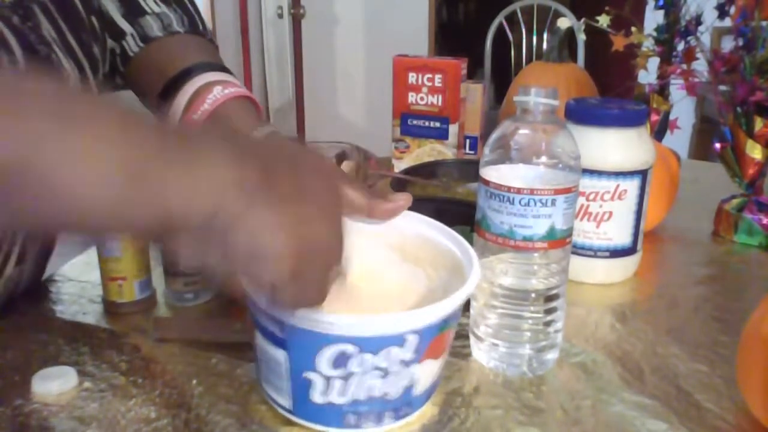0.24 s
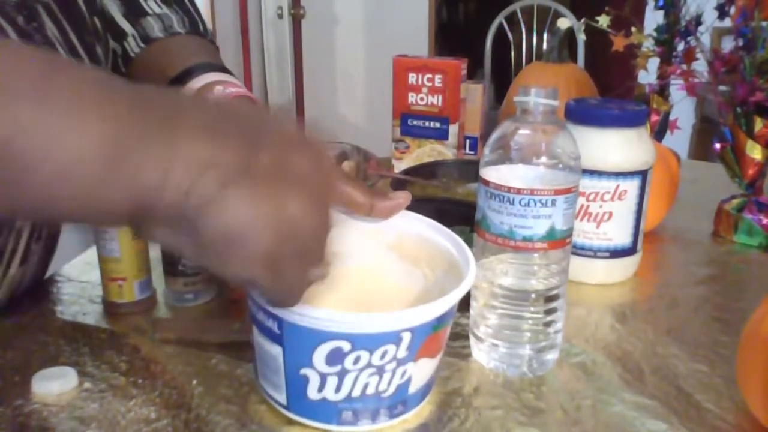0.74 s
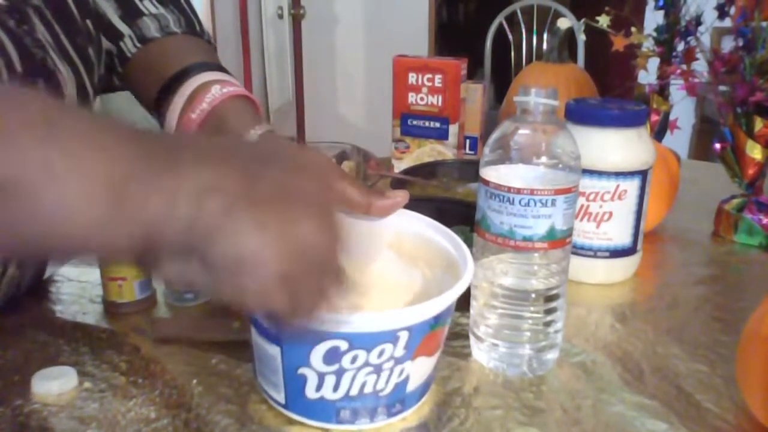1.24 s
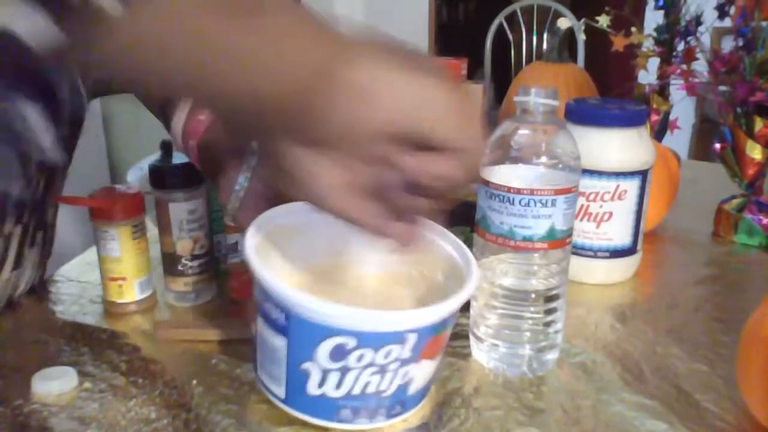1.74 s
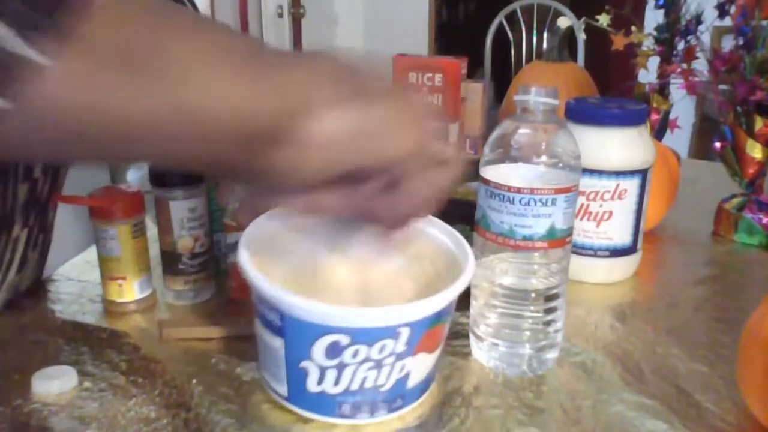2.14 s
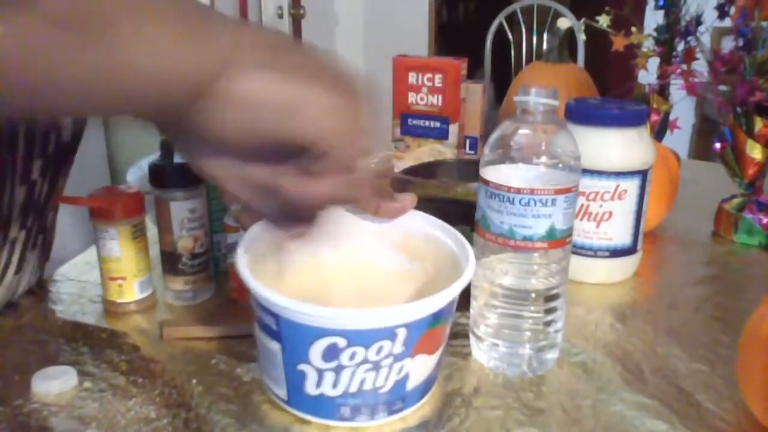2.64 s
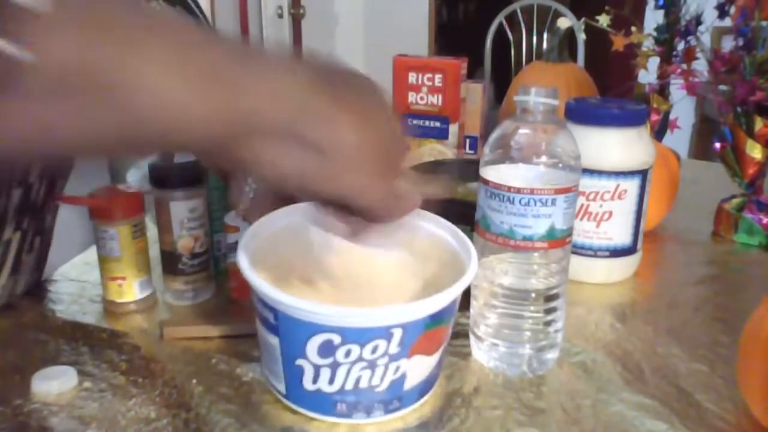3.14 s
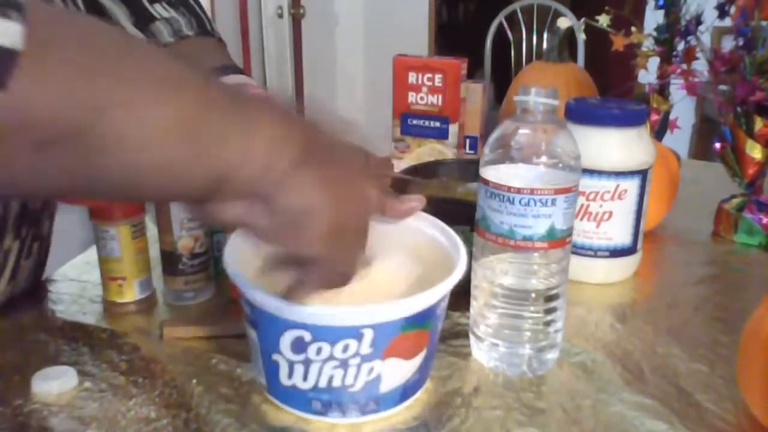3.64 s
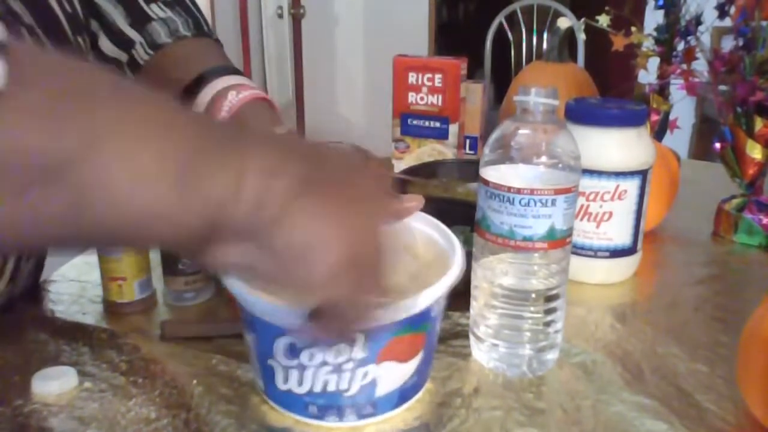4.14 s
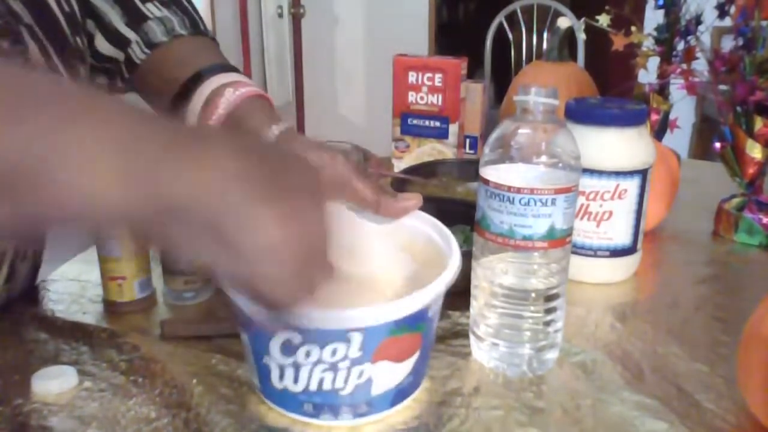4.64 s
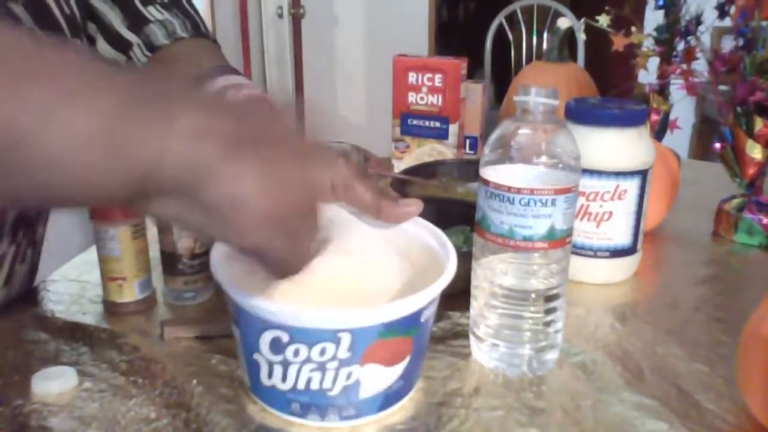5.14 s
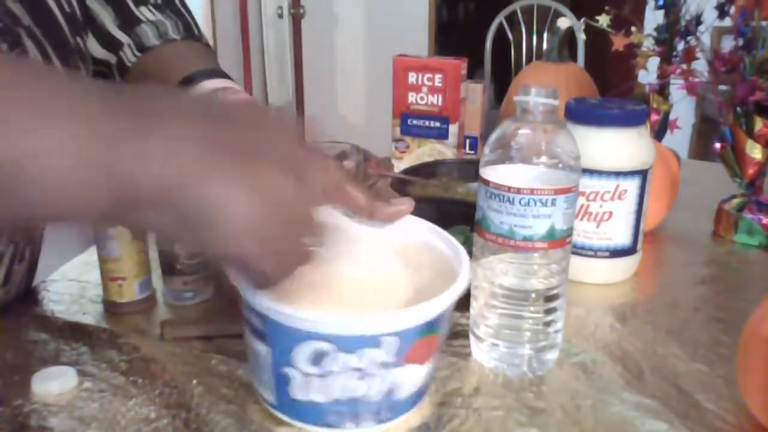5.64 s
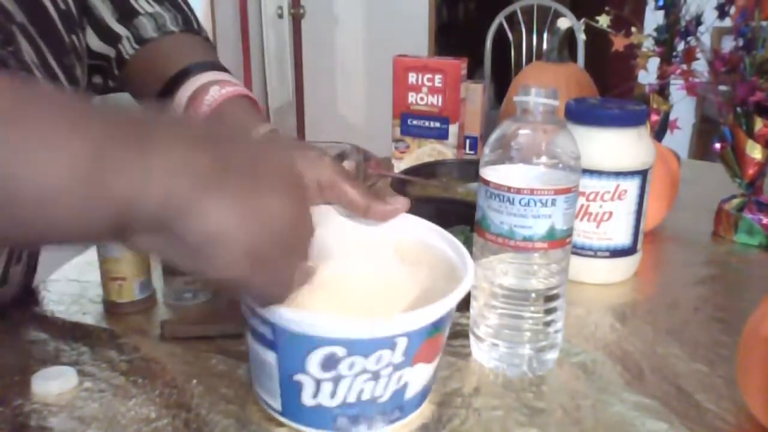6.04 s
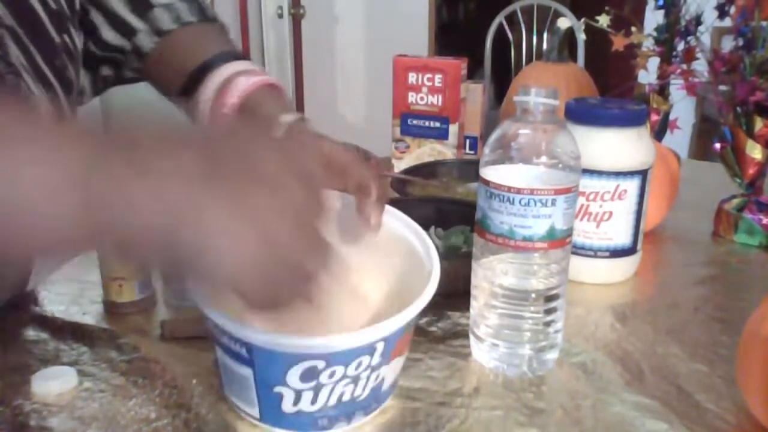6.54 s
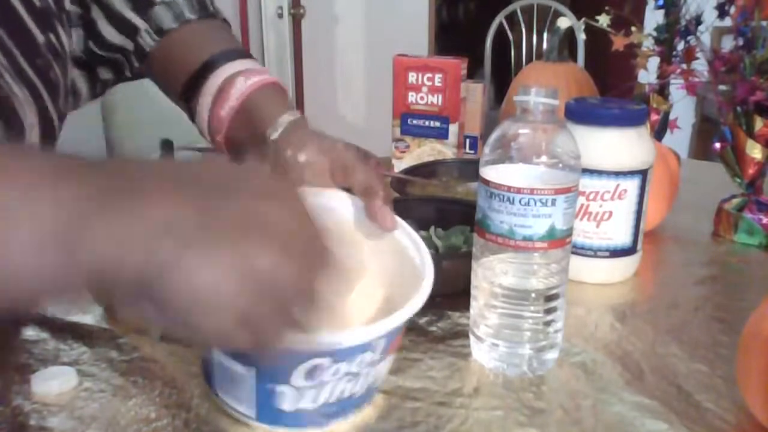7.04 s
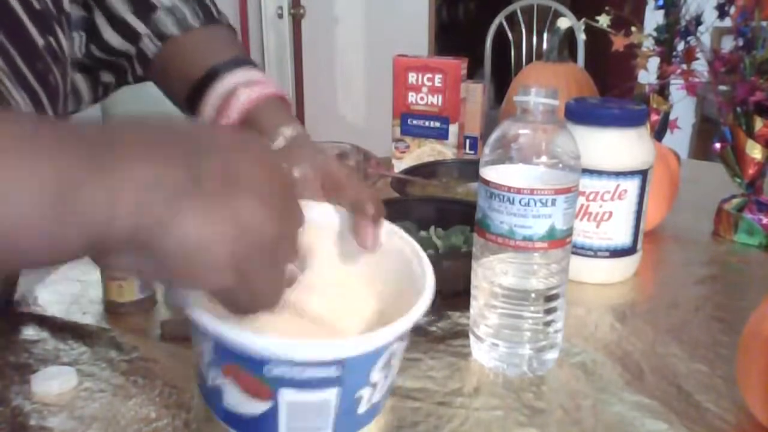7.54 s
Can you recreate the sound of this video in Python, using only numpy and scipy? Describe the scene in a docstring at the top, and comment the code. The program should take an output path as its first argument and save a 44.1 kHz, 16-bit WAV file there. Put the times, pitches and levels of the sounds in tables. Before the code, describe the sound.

Close in a small kitchen, a spoon beats thick batter in a thin plastic tub at four or five strokes a second. Each stroke gives a sticky squelch, a wet slap and a dull low thud. After a second or so the beating breaks off for soft scrapes and isolated pops, then resumes in a long even run. The sound is dull on top, with short gated tails.

```python
"""On a kitchen table a spoon beats thick batter in a thin plastic tub, four or five strokes a second,
with a pause to scrape down the side. Random bubble bursts, tuned by resonators, make each stroke's sticky drag;
torn films and ringing pockets make the slaps and pops; low modes of tub and table make the thuds.
A small room answers with dense reflections, and the recorder's noise gate shortens the tails."""
import sys
import numpy as np
from scipy import signal
from scipy.io import wavfile
from scipy.ndimage import uniform_filter1d

SR = 44100
rng = np.random.default_rng(int(sys.argv[2]) if len(sys.argv) > 2 else 0)


def output_pcm(signal):
    """Save a mono or channel-first signal as 16-bit PCM at the path in sys.argv[1].

    Samples are clipped to [-1, 1] before scaling.
    """
    pcm = np.clip(np.atleast_2d(signal).T, -1, 1) * 32767
    wavfile.write(sys.argv[1], SR, np.round(pcm).astype(np.int16))


N = 343980
TIME = np.arange(N) / SR

# beating strokes, from the spoon's entry to its arrival at the wall:
# start t/s, length t/s, effort level/dB, thud at the wall level/dB
STROKES = [(-.07, 0.057, -44.5, -36.5), (0.141, 0.047, -38.5, -30.5), (0.358, 0.059, -48, -41),
           (0.574, 0.033, -57.5, -35.5), (0.761, 0.056, -41.5, -39.5), (0.986, 0.062, -43, -53),
           (1.2, 0.041, -37.5, -39), (2.128, 0.022, -47.5, -47), (2.924, 0.032, -45, -40),
           (3.047, 0.031, -51, -70), (3.489, 0.057, -42.5, -31), (3.695, 0.07, -42, -38),
           (3.903, 0.045, -36.5, -39), (4.101, 0.084, -39.5, -37), (4.34, 0.045, -32, -32.5),
           (4.552, 0.051, -35.5, -41.5), (4.76, 0.069, -42.5, -34.5), (5.012, 0.047, -31, -32),
           (5.21, 0.062, -40.5, -40.5), (5.443, 0.073, -40, -40.5), (5.669, 0.063, -41, -33),
           (5.87, 0.088, -37.5, -33.5), (6.085, 0.095, -45, -39.5), (6.325, 0.07, -48, -33),
           (6.548, 0.062, -56.5, -35), (6.774, 0.091, -42, -38), (6.991, 0.073, -43.5, -50.5),
           (7.205, 0.078, -45, -42.5), (7.432, 0.058, -52, -60), (7.61, 0.051, -53, -65),
           (7.681, 0.058, -62.5, -67)]


def from_db(db):
    """The decibel is logarithmic: 20 dB is a factor of ten in amplitude."""
    return 10 ** (np.asarray(db) / 20)


def rms(x):
    """Effective amplitude is the root of the mean power."""
    return np.sqrt(np.mean(x ** 2) + 1e-20)


def band(x, edges_hz, order=2):
    """A causal band-pass keeps the energy between two frequencies."""
    return signal.sosfilt(signal.butter(order, edges_hz, "band", fs=SR, output="sos"), x + 1e-18)


def boost(x, hz, width_hz, db):
    """Resonance: a mode added to the direct sound lifts its own neighbourhood."""
    b, a = signal.iirpeak(hz, hz / width_hz, fs=SR)
    return x + (from_db(db) - 1) * signal.lfilter(b, a, x + 1e-18)


def add(out, s, sound):
    """Superposition: a sound adds linearly to the mix from time s."""
    start = int(s * SR)
    part = sound[max(-start, 0):max(N - start, 0)]
    out[max(start, 0):max(start, 0) + len(part)] += part


def in_tub(x):
    """Damped resonance: the tub colours every sound in the batter, which broadens the narrow modes."""
    # wall and hollow of the tub: f/Hz, undamped width f/Hz, boost level/dB
    tub_modes = [(462.3, 54, 8), (672.5, 39, 7.5), (961, 45, 7), (1100, 390, 6), (1590, 570, 7),
                 (1811, 45, 7.5), (2030, 50, 1.5), (2436, 450, 7.5), (3124, 45, 4), (3680, 860, 6),
                 (4850, 69, 0.5), (6240, 790, 2)]
    for hz, width_hz, db in tub_modes:
        damped_hz = max(width_hz, hz / 30)
        x = boost(x, hz, damped_hz, db)
    return x


def drag(length_s, attack_s, edges_hz, bursts_per_s, spread_db, hiss, release_s,
         bubble_q=30.0, bubble_db=20.0, grip_db=8.5, grip_s=.012):
    """Stick-slip and random bursting: bubbles of five sizes, each at bursts_per_s, excite damped resonances."""
    t = TIME[:int((max(length_s, .01) + .09) * SR)]
    release = np.exp(-np.maximum(t - length_s, 0) / release_s)
    push = (1 - np.exp(-t / attack_s)) * release
    # the spoon's hold on the batter wanders at random every grip_s
    grip = from_db(grip_db * np.interp(t / grip_s, np.arange(64), rng.standard_normal(size=64)))
    steps = np.geomspace(*edges_hz, num=6)
    bubbles = 0
    for hz in rng.uniform(steps[:-1], steps[1:]):
        born = rng.random(len(t)) < bursts_per_s / SR
        sizes = from_db(spread_db * np.minimum(rng.exponential(1, len(t)), 3))
        bubbles = bubbles + boost(sizes * born, hz, hz / bubble_q, bubble_db)
    source = bubbles / rms(bubbles) + hiss * rng.standard_normal(len(t))
    sound = band(in_tub(push * grip * source), edges_hz, order=3)
    return sound / rms(sound) * rms(push)


def drags():
    """Bubble size sets pitch: large ones squelch, small ones crackle, and a soft hiss marks the spoon's entry."""
    # light scrapes along the side, the longest in the pause: start t/s, length t/s, rasp level/dB
    scrape_table = [(0.941, .03, -61), (1.576, 0.18, -45.5), (1.99, 0.06, -63), (2.516, 0.2, -53.5),
                    (6.269, 0.018, -52.5), (6.455, 0.036, -55.5), (7.154, 0.1, -52)]
    squelch_hz, crackle_hz, rasp_hz = (360, 1400), (1500, 4640), (1800, 6600)
    usual_effort_db, crackle_db, crackle_growth = -45, -6, 1.36  # growth: crackle dB per dB of effort
    scrape_squelch_db = -5.5  # against the rasp: a scrape moves little batter
    stroke_attack_s, scrape_attack_s = .0005, .016  # a stroke bites at once, a scrape eases in
    entry_lead_s, entry_db, spray_s = 0.012, -11.0, 0.023  # the hiss peaks spray_s after its onset
    smooth_share = .3  # steady hiss against the crackle or rasp bubbles
    moves = []
    for start, length, db, _ in STROKES:
        high_db = usual_effort_db + crackle_db + crackle_growth * (db - usual_effort_db)
        moves.append((start, length, db, high_db, stroke_attack_s, crackle_hz))
    for start, length, db in scrape_table:
        moves.append((start, length, db + scrape_squelch_db, db, scrape_attack_s, rasp_hz))
    out, wetness = np.zeros(N), np.zeros(N)
    t = TIME[:SR // 5]
    spray = t / spray_s * np.exp(1 - t / spray_s)
    for start, length, low_db, high_db, attack_s, treble_hz in moves:
        add(wetness, start - entry_lead_s, from_db(high_db + entry_db) * spray)
        squelch = drag(length, attack_s, squelch_hz, bursts_per_s=710 / 6, spread_db=8.0,
                       hiss=smooth_share / 2, release_s=0.033)
        add(out, start, from_db(low_db) * squelch)
        crackle = drag(length, attack_s, treble_hz, bursts_per_s=200, spread_db=-2.0,
                       hiss=smooth_share, release_s=0.026)
        add(out, start, from_db(high_db) * crackle)
    hiss = band(in_tub(rng.standard_normal(N)), (1200, 6200))
    return out + wetness * hiss / rms(hiss)


def pushes():
    """Impulsive loading: a stroke loads the tub on entry and at the wall; rows of (s, swell s, dB)."""
    # push as the spoon enters, interpolated between rows, most in the middle run: t/s, level/dB
    entry_push = [(.1, -48.5), (.36, -40.5), (.7, -69), (1.3, -66), (2.9, -48.5), (3.7, -58), (4.1, -40.5),
                  (4.5, -37.5), (5.0, -34.5), (5.87, -35.5), (6.8, -65.5), (7.6, -75)]
    # the tub shifts on the table between strokes: t/s, level/dB
    nudge_table = [(0.069, -48), (.3, -43.5), (0.448, -51), (1.602, -37.5), (2.612, -51), (3.32, -43),
                   (4.468, -42.5), (4.638, -48), (6.512, -49)]
    entry_swell_s, wall_swell_s, nudge_swell_s = 0.028, 0.022, 0.026
    push_s, push_db = np.transpose(entry_push)
    entries = [(start, entry_swell_s, np.interp(start, push_s, push_db)) for start, *_ in STROKES]
    walls = [(start + length, wall_swell_s, db) for start, length, _, db in STROKES]
    return entries + walls + [(s, nudge_swell_s, db) for s, db in nudge_table]


def thuds():
    """Modal excitation: a soft load swells in the low modes, a little detuned by the hand, and the table hums on."""
    # tub and table together, before each thud's own variation: f/Hz, level/dB
    thud_modes = [(98, -14.5), (130, 1), (142, -1.5), (158, -18.5), (176, -5.5), (203, -8), (240, -12.5)]
    rumble_db = -15.5  # against the modes
    ring_hz, ring_t60_s, ring_db = 130.36, .45, -6.48
    out, t = np.zeros(N), TIME[:SR // 3]
    for s, swell_s, db in pushes():
        hum = 0
        for hz, mode_db in thud_modes:
            size, detune, phase = rng.standard_normal(3)
            mode = np.sin(2 * np.pi * (hz * (1 + .025 * detune) * t + phase))
            hum = hum + from_db(mode_db + 1.2 * size) * mode
        rumble = band(rng.standard_normal(len(t)), (65, 260))
        swell = (t / swell_s * np.exp(1 - t / swell_s)) ** 2
        ring_level = from_db(ring_db - 60 * t / ring_t60_s) * np.tanh(t / swell_s)
        ring = ring_level * np.sin(2 * np.pi * ring_hz * t)
        thud = swell * (hum / rms(hum) + from_db(rumble_db) * rumble / rms(rumble)) + ring
        add(out, s, from_db(db) * thud / rms(thud) * rms(swell))
    return out


def pocket_ring(hz, swell_cycles=1.26, glide=0.084, settle_cycles=2.0, linger_db=-21.0, linger_cycles=14.0):
    """Cavity resonance: an opening pocket rings a few cycles, its pitch sliding as the batter gives way."""
    cycles = hz * TIME[:SR // 20]
    size, slide, hold = rng.uniform(-1, 1, size=3)
    age = cycles / (swell_cycles * np.exp(.3 * size))
    # a soft tone lingers
    linger = from_db(linger_db + 4.5 * hold) * (1 - np.exp(-age)) * np.exp(-cycles / linger_cycles)
    linger = linger * np.linspace(1, 0, len(age))
    pitch = hz * (1 + glide * slide * (np.tanh(cycles / settle_cycles) - 1))
    return (age * np.exp(-age) + linger) * np.sin(2 * np.pi * np.cumsum(pitch) / SR)


def slap(hz, body_db, snap_db, tear_s=0.0038, tear=0.14, pocket_q=1.2, pocket_db=8.5, ring_db=5.0):
    """Impulse response: a film of batter bursts with a short tear, and the pocket behind it rings."""
    body_hz, smack_hz, snap_hz = (334, 811), (800, 2280), (2460, 5600)
    # the smack is strongest from middling pockets and falls with the square of the octaves away
    smack_peak_db, smack_best_hz, smack_fall_db = -10.5, 1170, 7
    t = TIME[:SR // 20]
    burst = (t == 0) + tear * np.exp(-t / tear_s) * rng.standard_normal(len(t))
    # a smaller fold beside the pocket rings briefly too
    fold_hz = rng.uniform(1500, 4200)
    burst = boost(burst, fold_hz, fold_hz / 9, 7)
    pop = in_tub(boost(burst, hz, hz / pocket_q, pocket_db))
    smack_db = smack_peak_db - smack_fall_db * np.log2(hz / smack_best_hz) ** 2
    parts = [band(pop, body_hz), band(pop, smack_hz, order=3), band(pop, snap_hz, order=3)]
    # the ring dominates the range in which it lies
    home = np.searchsorted([body_hz[1], snap_hz[0]], hz)
    ring = pocket_ring(hz)
    parts[home] = parts[home] / rms(parts[home]) + from_db(ring_db) * ring / rms(ring)
    # levels refer to the first 10 ms
    levels = (body_db, smack_db, snap_db)
    return sum(from_db(db) * part / rms(part[:SR // 100]) for db, part in zip(levels, parts))


def slaps(body_db=-4.5, snap_db=-5.5, stretch_s=.0012):
    """Film rupture: large pockets burst after a moment's stretch; small pops scatter along each stroke."""
    # larger air pockets as their films begin to stretch: t/s, strength level/dB, pocket pitch f/Hz,
    # body relative to body_db level/dB, snap relative to snap_db level/dB
    burst_table = [(0.143, -19, 1100, -15, -31.5), (0.148, -18, 1860, -10, -33.5),
                   (0.165, -21, 2780, -28, -6), (0.193, -17, 905, -10.5, -14), (0.24, -38, 1030, -5, -23.5),
                   (0.36, -24, 1144, -20.5, -31.5), (0.409, -9.5, 680, -8, -21), (0.573, -38, 910, -9, -43),
                   (0.611, -19.5, 1108, -11, -18), (0.65, -29, 1740, -31.5, -20.5),
                   (0.759, -14, 1850, -41.5, -7.5), (0.791, -22, 712, -8.5, -16),
                   (0.823, -16, 951, -20.5, -16), (0.864, -39, 1020, -22, -10.5),
                   (0.992, -16.5, 670, -16.5, -34), (1.008, -28, 1110, -38, -8.5),
                   (1.045, -21, 972, -23.5, -15.5), (1.17, -33.5, 2860, -20.5, -6),
                   (1.21, -28, 733, -5.5, -16.5), (1.245, -12.5, 1880, -10, -18),
                   (1.603, -21, 435, -11.5, -17.5), (1.709, -27.5, 2990, -44, 0.5),
                   (1.76, -18, 2496, -34, -1.5), (1.941, -30, 358, -3, -26.5), (1.975, -34, 448, -3, -25),
                   (2.002, -45, 2520, -20.5, -1.5), (2.143, -23.5, 1170, 2, -13),
                   (2.39, -46.5, 2270, -25.5, -37.5), (2.485, -41, 1930, -16.5, -35),
                   (2.725, -40.5, 910, -29.5, -17), (2.938, -19, 1040, -3.5, -14),
                   (2.992, -43.5, 613, 5.5, -9), (3.058, -20, 1033, -47, -41.5),
                   (3.102, -31.5, 1013, -35.5, -29), (3.284, -23.5, 687, -12.5, -22),
                   (3.336, -20, 595, -17, -17), (3.497, -26.5, 972, -10.5, -9.5),
                   (3.511, -31, 1080, -7.5, -28.5), (3.545, -26.5, 1116, -5.5, -4),
                   (3.552, -15, 966, -8.5, -7.5), (3.721, -20.5, 980, -41.5, -13.5),
                   (3.752, -21, 972, -3, -33), (3.764, -7, 467, -18, -21.5), (3.906, -27, 3350, -23, 4),
                   (3.922, -16.5, 960, -20.5, -18), (3.938, -15, 1590, -7.5, -11.5),
                   (3.97, -5, 473, -17, -21), (4.085, -32, 1760, -37.5, -20.5),
                   (4.116, -18.5, 1090, -2.5, -9.5), (4.148, -15, 1650, -22.5, -14),
                   (4.185, -17.5, 650, 2.5, -8.5), (4.342, -18.5, 1048, -7, -15),
                   (4.362, -15, 2060, -14.5, -18), (4.372, -10, 1790, -25, -15),
                   (4.381, -14, 1860, -23, -20.5), (4.556, -16.5, 1107, -4.5, -13.5),
                   (4.579, -10, 2230, -28, -20), (4.617, -16, 924, -8.5, -13),
                   (4.775, -19, 1020, -10.5, -4.5), (4.792, -12.5, 2030, -22.5, -14.5),
                   (4.84, -11.5, 610, -5, -15.5), (5.01, -22, 956, -2, -14), (5.03, -4.5, 2370, -30, -20),
                   (5.226, -9, 1870, -10.5, -12.5), (5.236, -10.5, 1056, -30.5, -17.5),
                   (5.306, -19.5, 915, -15.5, -12.5), (5.344, -30.5, 1010, -29, -19),
                   (5.447, -9.5, 2330, -10, -20.5), (5.459, -9.5, 2410, -16.5, -16.5),
                   (5.472, -16.5, 1680, -14.5, -6), (5.513, -25, 1730, -10, -50),
                   (5.521, -18.5, 1590, -12.5, -17), (5.674, -19, 983, -13.5, -15.5),
                   (5.682, -21, 1090, -11, -10.5), (5.715, -22.5, 1851, -20, -24),
                   (5.741, -14, 1033, -21, -22), (5.878, -10.5, 626, -14.5, -34.5),
                   (5.913, -26.5, 970, -8.5, -22), (5.954, -4.5, 630, -12, -23), (6.097, -21, 1100, -5, -6),
                   (6.119, -27, 954, -27, -15), (6.172, -16.5, 1064, -35.5, -46.5),
                   (6.273, -30.5, 924, -40.5, -4), (6.336, -22.5, 890, -32, -13),
                   (6.382, -7, 1680, -5, -19.5), (6.492, -34.5, 953, -16, -13.5),
                   (6.554, -34.5, 1020, -16, -53), (6.612, -8, 992, -18, -20), (6.79, -26, 1740, -19, -29),
                   (6.801, -28, 1335, -31.5, -37), (6.843, -10.5, 1193, -9.5, -20.5),
                   (7.012, -23.5, 1780, -14.5, -11), (7.067, -7.5, 1000, -11, -33.5),
                   (7.129, -28, 1103, -32, -38), (7.219, -23.5, 1800, -44, -21),
                   (7.248, -36, 1065, -27, -20), (7.275, -3, 657, -11, -32),
                   (7.442, -20.5, 937, -38, -37.5), (7.473, -30.5, 915, -16, -31),
                   (7.485, -18, 1015, -37, -33), (7.548, -33, 1711, -31, -40),
                   (7.615, -21.5, 1690, -23.5, -48), (7.653, -26.5, 1057, -31, -40.5),
                   (7.713, -52, 623, 17, -29), (7.764, -50, 586, 17, -34)]
    pops_per_s, pop_pitch_hz = 12.0, (920, 2420)
    out = np.zeros(N)
    for s, db, hz, fullness_db, crispness_db in burst_table:
        sound = slap(hz, body_db + fullness_db, snap_db + crispness_db)
        add(out, s + stretch_s, from_db(db) * sound)
    pitches = np.exp(rng.uniform(*np.log(pop_pitch_hz), size=16))
    pops = [slap(hz, body_db=-31.5, snap_db=-33) for hz in pitches]
    for start, length, effort_db, _ in STROKES:
        pockets = rng.random(size=(4, 4))
        for chance, place, pick, size in pockets:
            if chance < pops_per_s * length / len(pockets):
                pop = pops[int(pick * len(pops))]
                pop_db = effort_db + 26 - 2 * size
                add(out, start + place * length, from_db(pop_db) * pop)
    return out


def kitchen(x, first_echo_s=0.0039, build_s=0.00045):
    """Reverberation: dense reflections follow the direct sound and die away band by band."""
    # small room, interpolated over log frequency: f/Hz, reverberation time t60/s, echo level/dB
    room_bands = [(150, 0.85, -13.5), (390, 0.057, -7), (820, 0.21, -11.5), (1980, 0.18, -9),
                  (4300, 0.42, -18), (5680, 0.11, -7.5)]
    t, response = TIME[:SR // 2], 0
    hz, t60_s, echo_db = np.transpose(room_bands)
    edges = np.geomspace(80, 8000, num=9)
    for low, high in zip(edges, edges[1:]):
        centre = np.log(low * high) / 2
        decay = from_db(-60 * t / np.interp(centre, np.log(hz), t60_s))
        fade = decay * (1 - np.exp(-np.maximum(t - first_echo_s, 0) / build_s))
        tail = band(rng.standard_normal(len(t)) * fade, (low, high), order=3)
        # energy in proportion to bandwidth, so the echo level is relative to the direct sound
        share = np.sqrt(2 * (high - low) / SR / np.sum(tail ** 2))
        response = response + tail * share * from_db(np.interp(centre, np.log(hz), echo_db))
    return x + signal.fftconvolve(x, response)[:N]


def scene():
    """Superposition: batter and tub sound together in the room, over a faint hiss."""
    hiss_db = -75
    hiss = band(rng.standard_normal(N), (150, 4000), order=2)
    batter = kitchen(slaps() + drags() + thuds())
    return (batter + from_db(hiss_db) * hiss / rms(hiss))[None]


def noise_gate(x, threshold_db=-66.5, slope=0.68, tilt_db=-5.5):
    """Downward expansion: narrow bands under a threshold, lower with each octave, are turned down further."""
    size, depth_db = 512, 28
    overlap = size - size // 4
    hz, _, spectra = signal.stft(x, SR, nperseg=size, noverlap=overlap)
    # power is smoothed over neighbouring frequencies, then over time
    power = uniform_filter1d(np.abs(spectra) ** 2, size=3, axis=-2)
    power = uniform_filter1d(power, size=5, axis=-1)
    # the threshold is given at 1 kHz and stays level below 125 Hz
    limit_db = threshold_db + tilt_db * np.log2(np.maximum(hz, 125) / 1000)[:, None]
    level_db = 10 * np.log10(np.abs(power) + 1e-16)
    cut_db = np.clip(slope * (limit_db - level_db), 0, depth_db)
    return signal.istft(spectra * from_db(-cut_db), SR, nperseg=size, noverlap=overlap)[1][..., :N]


def record(dry, roll_off_hz=6800, cutoff_hz=7670, leak_db=3.0):
    """Band limiting: a gated speech-band microphone; the top treble leaks past its gate and filters."""
    roll_off = signal.butter(10, roll_off_hz, fs=SR, output="sos")
    cutoff = signal.ellip(8, .3, 60, cutoff_hz, fs=SR, output="sos")
    heard = signal.sosfilt(roll_off, noise_gate(dry))
    top = band(dry, (12000, 15500), order=6)
    return signal.sosfilt(cutoff, heard) + from_db(leak_db) * top


dry = scene()
out = record(dry)
output_pcm(out)
```